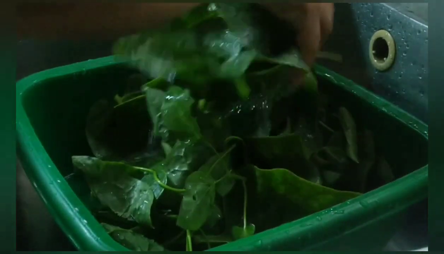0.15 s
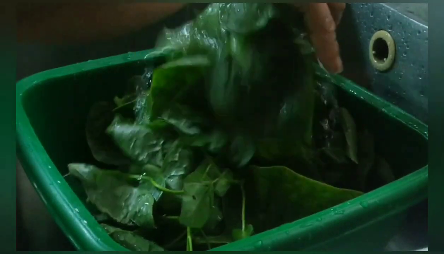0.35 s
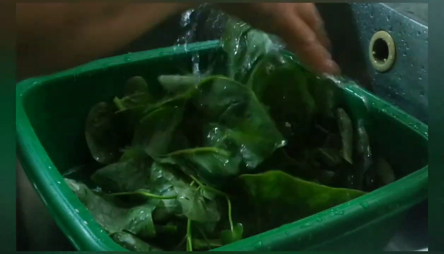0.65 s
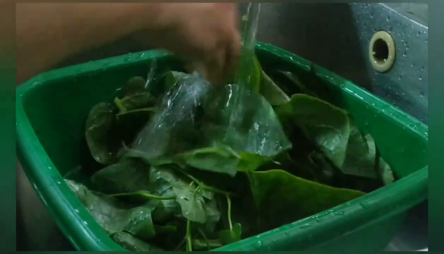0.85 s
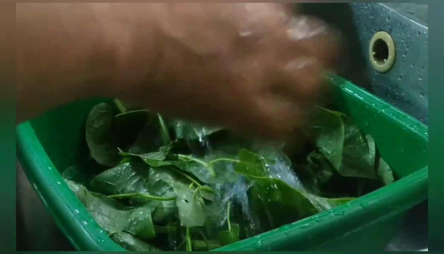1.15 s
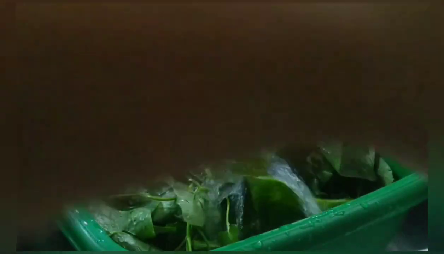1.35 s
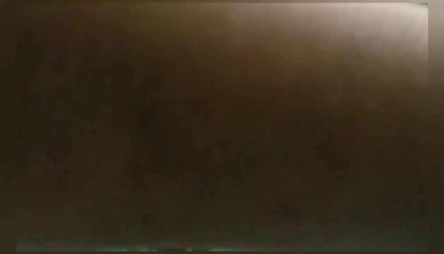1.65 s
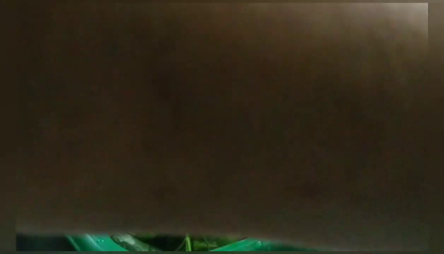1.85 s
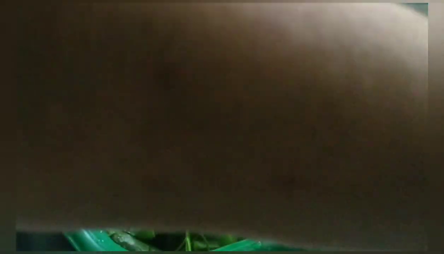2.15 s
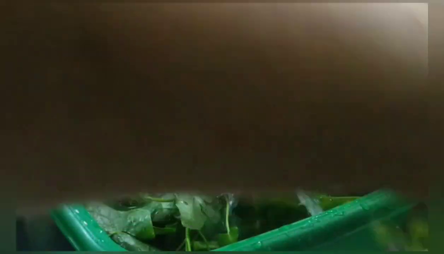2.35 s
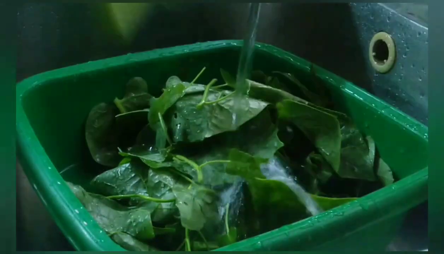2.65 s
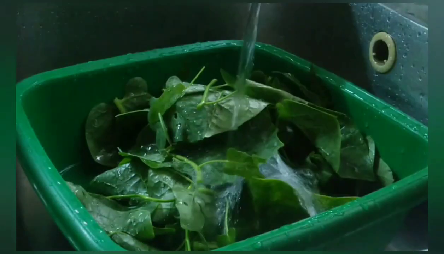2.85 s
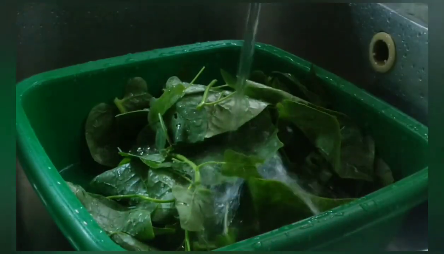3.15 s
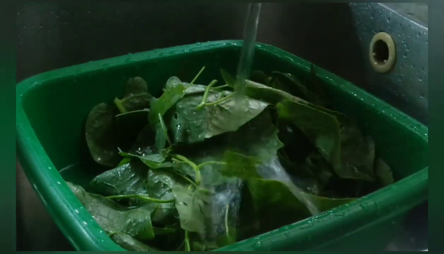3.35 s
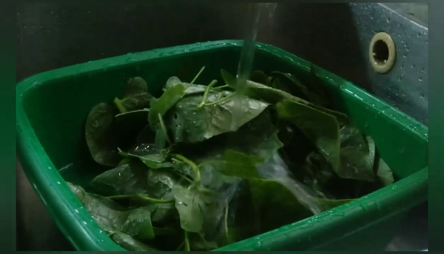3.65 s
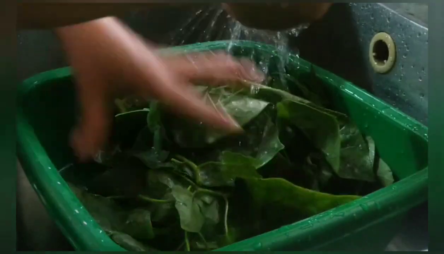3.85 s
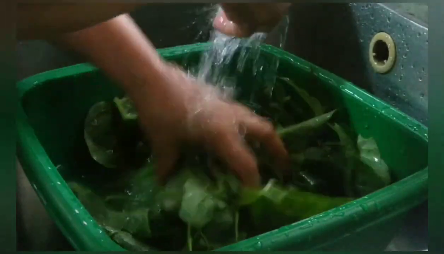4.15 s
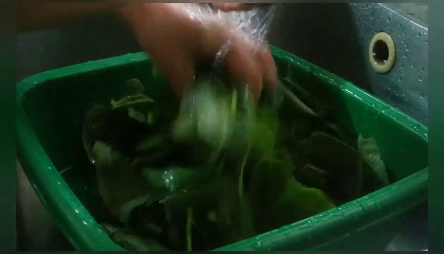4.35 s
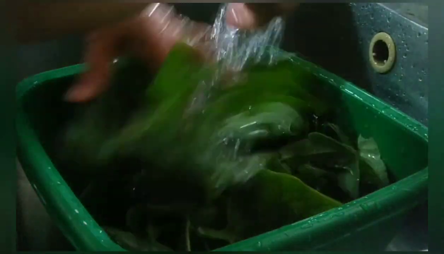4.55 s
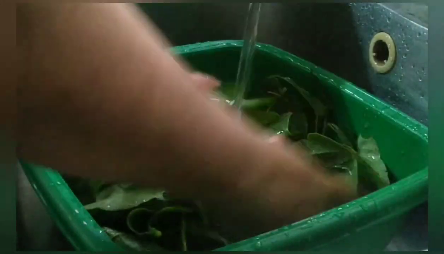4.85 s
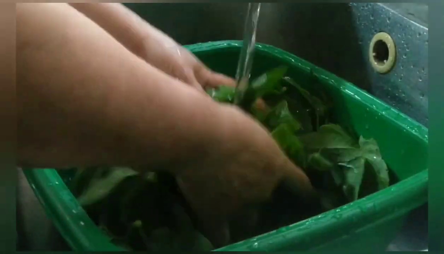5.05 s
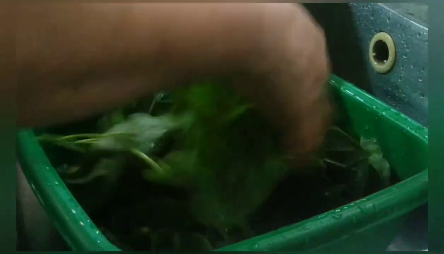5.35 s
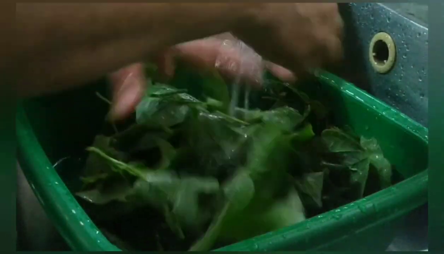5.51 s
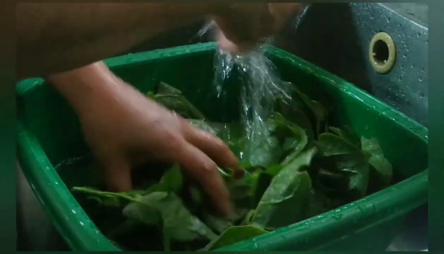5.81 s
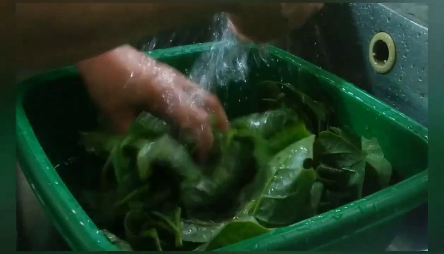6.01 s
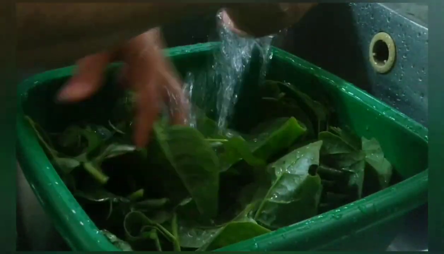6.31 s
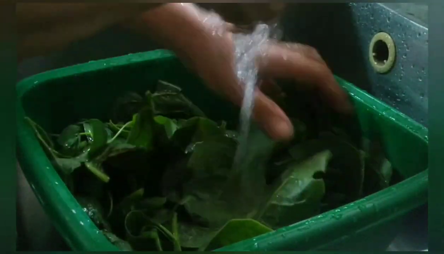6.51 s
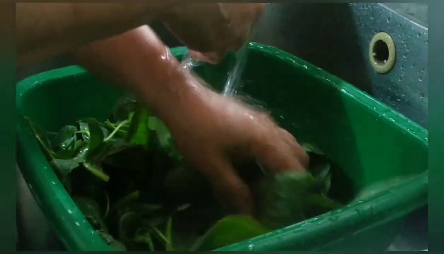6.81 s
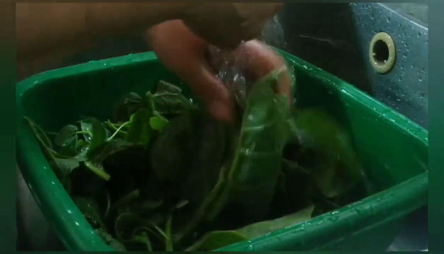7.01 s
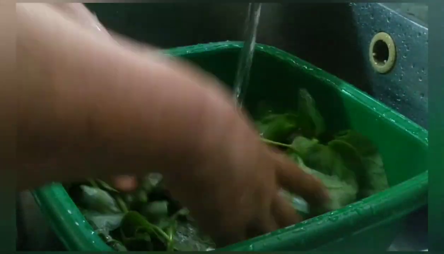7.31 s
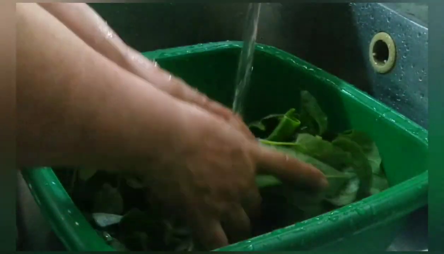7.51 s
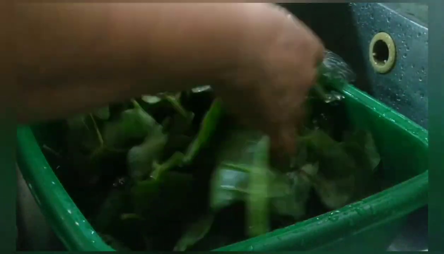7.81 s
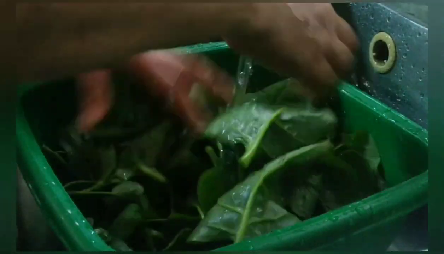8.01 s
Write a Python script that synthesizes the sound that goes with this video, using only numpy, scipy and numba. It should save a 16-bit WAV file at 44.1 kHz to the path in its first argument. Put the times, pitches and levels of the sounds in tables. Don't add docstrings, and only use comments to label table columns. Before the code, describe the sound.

A thin tap stream splashes on leafy greens in a plastic basin set in a steel sink. Hands lift and turn the leaves, making bursts of spray and gurgles. The water thins to a quiet patter, then the basin slips with a loud hollow clatter, and busier stirring follows with sharp knocks. Close stereo pickup in a small hard kitchen with faint hum.

```python
import sys
import numpy as np
from scipy import signal
from scipy.fft import rfft, irfft, next_fast_len
from scipy.io import wavfile
from scipy.ndimage import uniform_filter1d
from numba import njit

SR = 44100
rng = np.random.default_rng(int(sys.argv[2]) if len(sys.argv) > 2 else 0)


def materialize(psi):
    bounded = np.clip(np.atleast_2d(psi).T, -1, 1)
    quanta = np.round(bounded * 32767).astype(np.int16)
    wavfile.write(sys.argv[1], SR, quanta)


def makeup_ratio(level_db):
    decades = np.asarray(level_db, float) / 20
    return 10 ** decades


N = 360297
T = np.arange(N) / SR


def unit(x):
    return x / np.sqrt(np.mean(np.abs(x) ** 2))


def colour(x, points):
    size = next_fast_len(N)
    hz, db = np.transpose(points)
    f = np.log(np.arange(size // 2 + 1) * SR / size + 1)
    gain = makeup_ratio(np.interp(f, np.log(hz), db))
    return irfft(rfft(x, size) * gain, size)[..., :N]


def band(x, lo_hz, hi_hz):
    sos = signal.butter(3, [lo_hz, min(hi_hz, SR / 2.2)], "band", fs=SR, output="sos")
    return signal.sosfilt(sos, x)


def walk(rate):
    k = int(SR / rate)
    steps = np.repeat(rng.standard_normal(N // k + 1), k)[:N]
    return unit(uniform_filter1d(steps, k))


def every_sample(curve):
    return np.interp(T, T[::32], curve)


def peak(s, rise, fall):
    late = T[None, ::32] - np.array(s)[:, None]
    before = -late / np.array(rise)[:, None]
    after = late / np.array(fall)[:, None]
    return np.exp(-np.where(late > 0, after, before))


def gestures_db(table):
    s, db, rise, fall = np.transpose(table)
    return every_sample(db @ peak(s, rise, fall))


def swells(table, rest_db, column):
    s, rise, fall = np.transpose(table)[:3]
    power = makeup_ratio(rest_db) ** 2 + makeup_ratio(column) ** 2 @ peak(s, rise, fall) ** 2
    return every_sample(np.sqrt(power))


@njit
def grains(count, start, hz, cycles, size, lean, glide, rise):
    out = np.zeros((2, count))
    for k in range(len(start)):
        p = np.exp((2j * np.pi - 1 / cycles[k]) * hz[k] / SR)
        turn = np.exp(2j * np.pi * glide * (hz[k] / SR) ** 2 / cycles[k])
        opening = np.exp(-hz[k] / SR / (rise * cycles[k]))
        z, unopened = size[k] + 0j, 1.
        for i in range(start[k], min(count, start[k] + int(6 * cycles[k] * SR / hz[k]))):
            out[0, i] += (1 - unopened) * z.imag
            out[1, i] += (1 - unopened) * lean[k] * z.real
            z *= p
            p *= turn
            unopened *= opening
    return out


# (frequency [Hz], level [dB per Hz])
SPRAY_COLOUR = [(410, -35), (700, -7.5), (829, -2), (909, -1.5), (1310, -1), (1590, -9.5), (2450, -6),
                (3020, -8), (3620, -9), (5020, -10.5), (9140, -12.5), (11300, -19), (13300, -18),
                (15800, -22.5)]


def drops(lo_hz, hi_hz, count, cycles, burst_s, scatter_db, hiss, gush_db):
    u = np.repeat(rng.random((count, 3)), 3, axis=0).T
    v = rng.random((3 * count, 3)).T
    lean = 0.84 + 1.06 * np.repeat(rng.standard_normal(count), 3)
    hz = lo_hz * (hi_hz / lo_hz) ** u[1] * (.88 + 0.241 * v[0])
    hz = np.minimum(hz, SR / 2.4)
    size = makeup_ratio(scatter_db * np.minimum(-np.log(u[2] + 1e-9), 2.7)) * hz / hi_hz
    start = (u[0] * N + burst_s * SR * v[1]).astype(np.int64)
    fizz = grains(N, start, hz, cycles * (0.23 + 1.8 * v[2]), size, lean, 0.031, 0.1)
    mist = unit(fizz) + hiss * unit(band(rng.standard_normal((2, N)), lo_hz, hi_hz))
    return unit(band(colour(mist, SPRAY_COLOUR), lo_hz, hi_hz)) * makeup_ratio(gush_db * walk(22))


# (time [s], splash level [dB], fine spray relative to it [dB])
STREAM = [(0.0, -44, -5.5), (0.41, -39, -2), (0.975, -41.5, -0.5), (1.323, -49.5, 2.5), (2.042, -43.5, 1),
          (2.204, -52.5, 3.5), (2.559, -48, 4), (3.76, -44.5, 2), (3.998, -38, -3.5), (4.392, -37.5, -4),
          (4.7, -37.5, 0.5), (5.0, -33, -1.5), (5.359, -46.5, -1.5), (5.847, -37.5, -3), (6.5, -41, -1.2),
          (7.084, -41.0, -4), (7.377, -33.5, -2.5), (8.17, -36.5, 0.5)]
# (time [s], gain [dB], rise [s], fall [s])
THROWN_WATER = [(0.063, 7, 0.11, 0.016), (0.716, 4, 0.065, 0.019), (0.892, 9.5, 0.033, 0.055),
                (3.73, 1, 0.014, 0.026), (3.877, 5.5, 0.024, 0.011), (4.688, 1.5, 0.04, 0.085),
                (5.675, 4, 0.32, 0.015), (6.093, 10.5, 0.042, 0.034), (6.272, 3, 0.018, 0.2),
                (6.53, 9, 0.013, 0.03), (6.656, 8, 0.032, 0.013), (7.706, 6.5, 0.039, 0.14)]
# (time [s], loss [dB], rise [s], fall [s])
CAUGHT_STREAM = [(0.494, -14, 0.062, 0.18), (0.754, -12.0, 0.022, 0.05), (1.841, -8.5, 0.055, 0.047),
                 (2.509, -4, 0.019, 0.035), (3.275, -2.5, 0.03, 0.037), (3.803, -14, 0.034, 0.05),
                 (3.889, -9.4, 0.016, 0.032), (4.553, -21, 0.065, 0.035), (4.815, -13.5, 0.019, 0.033),
                 (4.897, -8, 0.018, 0.18), (5.998, -4.5, 0.11, 0.045), (6.206, -7.5, 0.14, 0.01),
                 (6.514, -4, 0.02, 0.012), (6.598, -8, 0.028, 0.02), (7.155, -12.5, 0.039, 0.016),
                 (7.251, -4.5, 0.024, 0.067), (7.884, -15, 0.11, 0.114)]
# (time [s], rise [s], fall [s], gurgle [dB], coarse drops relative to it [dB])
LEAF_STIRS = [(0.001, 0.05, 0.034, -39.5, -2.5), (0.969, 0.043, 0.048, -42, -1.5),
              (2.009, 0.076, 0.115, -59, 3), (2.441, 0.051, 0.285, -52, -7),
              (3.31, 0.0089, 0.059, -46.5, 15.5), (3.987, 0.048, 0.097, -42, 0),
              (4.116, 0.056, 0.092, -35.5, -2.0), (4.776, 0.003, 0.012, -39.5, 17.5),
              (4.893, 0.24, 0.097, -37, -1.5), (5.022, 0.07, 0.191, -36.5, 1.5),
              (5.745, 0.11, 0.18, -42, -11), (5.891, 0.15, 0.289, -48, 6),
              (6.236, 0.068, 0.12, -59.5, 12.5), (6.523, 0.003, 0.025, -55, 17),
              (6.712, 0.054, 0.33, -45, 2.5), (6.841, 0.13, 0.084, -41, -3), (7.266, 0.07, 0.039, -39, 0),
              (7.527, 0.12, 0.16, -36.5, -3), (7.726, 0.101, 0.12, -51.5, -2),
              (8.156, 0.24, 0.111, -45.5, 2)]
# (time [s], gain [dB], rise [s], fall [s])
LEAF_FOLDS = [(0.24, 7, 0.037, .05), (0.4, 7.5, .03, 0.034), (0.55, 11, 0.088, 0.085), (0.76, -5, .05, .05),
              (1.12, 7.5, .04, 0.049), (1.6, -7, 0.12, 0.22), (3.36, 3, .03, .04), (3.62, -4, .06, .1),
              (4.3, 7, .05, 0.059), (5.3, 2.5, 0.088, 0.054), (6.93, -14.5, 0.036, .025),
              (7.07, -7, 0.026, 0.035), (7.209, -8, .03, .03)]


def spray():
    s, splash_points, fine_points = np.transpose(STREAM)
    hands_db = gestures_db(THROWN_WATER) + gestures_db(CAUGHT_STREAM)
    splash_db = np.interp(T, s, splash_points) + hands_db
    fine_db = splash_db + np.interp(T, s, fine_points)
    gurgle_db, coarse_db = np.transpose(LEAF_STIRS)[3:]
    coarse_level = swells(LEAF_STIRS, -67.0, gurgle_db + coarse_db) + makeup_ratio(splash_db - 12.5)
    coarse_level = coarse_level * makeup_ratio(gestures_db(LEAF_FOLDS))

    coarse = coarse_level * drops(1278, 3307, count=2600, cycles=5.5, burst_s=.006,
                                  scatter_db=3.0, hiss=0.62, gush_db=0.0)
    splash = makeup_ratio(splash_db) * drops(3112, 8260, count=5000, cycles=6.7, burst_s=.003,
                                    scatter_db=3.0, hiss=0.66, gush_db=0.8)
    fine = makeup_ratio(fine_db) * drops(7780, 18100, count=5000, cycles=9.4, burst_s=.002,
                                scatter_db=6.0, hiss=0.8, gush_db=2.0)
    gurgle = drops(702, 1373, count=1100, cycles=4.1, burst_s=.012,
                   scatter_db=2.0, hiss=0.36, gush_db=1.0)
    gurgle = swells(LEAF_STIRS, -61.5, gurgle_db) * gurgle
    gurgle = gurgle + makeup_ratio(3.5) * band(gurgle, 770, 890)
    flutter = makeup_ratio(0.77 * walk(24) + 1.9 * walk(70) - 2.5)
    return flutter * (coarse + splash + fine) + gurgle


# (time [s], peak level [dB], pitch [Hz])
BIG_SPLATS = [(0.121, -28, 2300), (0.1506, -23, 5300), (0.182, -18, 5740), (2.748, -24, 7450),
              (0.8619, -19.5, 9270), (0.8734, -18, 4440), (1.0959, -23, 6340), (2.0438, -25.5, 3230),
              (3.045, -20, 8300), (3.3107, -21, 2330), (3.3149, -8, 1850), (3.7214, -22, 7740),
              (4.0238, -16.5, 4060), (4.0721, -21, 3670), (4.1774, -18.5, 7270), (4.3725, -22, 3370),
              (4.4453, -22.5, 2120), (4.6638, -15.5, 4800), (4.8633, -19, 3020), (5.665, -15.5, 8730),
              (6.0701, -19.5, 8300), (6.6029, -19.5, 8950), (6.661, -14.5, 2290), (6.972, -26, 2480),
              (7.117, -10.5, 3640), (7.1726, -24, 8500), (7.6765, -16, 7450), (7.7253, -17, 6320),
              (7.8665, -22.5, 2100), (7.9195, -26, 6670)]


def splats():
    length_s = .005
    s, db, hz = np.repeat(BIG_SPLATS, 8, axis=0).T
    u = rng.random((len(s), 3)).T
    start = ((s - .001 + length_s * 2.2 * u[0] ** 2.6) * SR).astype(np.int64)
    cycles = length_s * hz * 0.32 + 0.86
    return grains(N, start, hz * (0.832 + 0.341 * u[1]), cycles, makeup_ratio(db - 7), .2 + 1.0 * u[2], 0.034, 0.07)


def pops(table, count, spread, length_s, cycles, gain_db, fade_db):
    s, db, hz = np.repeat(table, count, axis=0).T
    u = rng.random((len(s), 3)).T
    start = ((s - .0004 + length_s * u[0] ** 2) * SR).astype(np.int64)
    hz = np.minimum(hz * np.exp(spread * (u[1] - .5)), SR / 2.6)
    size = makeup_ratio(db + gain_db - fade_db * u[0] ** 2)
    return grains(N, start, hz, cycles * (0.6 + 0.89 * u[0]), size, .2 + 1.3 * u[2], 0.04, .05)


# (time [s], peak level [dB], pitch [Hz])
DROPLET_TICKS = [(0.0198, -29, 5790), (0.0557, -29, 6450), (0.0766, -21, 7700), (0.3271, -23, 8400),
                 (0.3759, -22.5, 6260), (0.7296, -27, 6790), (0.79, -26.5, 8300), (0.8469, -31, 9030),
                 (0.9471, -28, 7200), (0.9731, -30, 9330), (0.9851, -20, 13000), (3.0259, -35, 9630),
                 (3.1247, -25, 13100), (3.5612, -29, 6850), (3.7353, -21.5, 6140), (3.9573, -22, 9750),
                 (4.0541, -36, 7980), (4.2162, -25, 9500), (4.6398, -27, 9300), (4.7176, -22, 9170),
                 (4.785, -23, 8040), (5.0653, -22, 5700), (5.201, -24, 8590), (5.5886, -21, 13240),
                 (6.0381, -24, 6360), (6.2431, -25, 7880), (6.3015, -21, 6980), (6.4616, -24, 7800),
                 (6.5499, -20.5, 9070), (6.6203, -25, 9000), (6.6527, -16.5, 5800), (6.8542, -22, 8400),
                 (6.8961, -27, 6910), (6.9126, -27.5, 7160), (6.9759, -25.5, 9000), (7.004, -20, 9200),
                 (7.3416, -26, 5620), (7.4713, -25, 8810), (7.4933, -26, 5700), (7.5851, -24, 5770)]
# (time [s], peak level [dB], pitch [Hz])
BUBBLE_BLIPS = [(0.0138, -26, 3410), (0.0816, -22, 4700), (0.1929, -30, 5140), (0.3151, -28, 5340),
                (0.363, -31, 5240), (0.7197, -27.5, 4200), (0.8519, -29, 4470), (1.5498, -36.5, 4010),
                (3.86, -30, 3570), (4.0047, -24, 4100), (4.1115, -28, 2460), (4.1758, -25, 3910),
                (4.2746, -26.5, 3600), (4.4681, -25, 5050), (4.6502, -31, 4760), (4.9543, -33, 2210),
                (5.0059, -29, 1610), (5.0688, -22, 2390), (5.201, -33, 2150), (5.692, -29.5, 3950),
                (5.7757, -25, 4640), (5.9564, -28, 2280), (6.2745, -25, 3760), (6.303, -29, 3660),
                (6.3715, -26, 5020), (6.3898, -25, 3360), (6.4437, -27.5, 3100), (6.6208, -26, 4930),
                (6.759, -29, 2360), (6.8747, -28, 4570), (7.006, -29, 2620), (7.0847, -31, 4450),
                (7.2029, -24, 4830), (7.2463, -27.5, 1620), (7.409, -24, 4770), (7.4399, -27, 4170),
                (7.5846, -20, 4030), (7.642, -28, 4400), (7.9901, -28.5, 1700), (8.1423, -26, 3970)]
# (time [s], peak level [dB])
FLAT_SMACKS = [(0.402, -21), (0.68, -26), (0.704, -31), (0.865, -28), (2.58, -31), (2.723, -32),
               (2.747, -21), (2.841, -25), (3.311, -21), (3.352, -17), (3.412, -20), (3.721, -22),
               (4.07, -24.5), (4.861, -21), (5.598, -33), (5.665, -18), (6.246, -23), (7.919, -23)]


def droplets():
    ticks = pops(DROPLET_TICKS, count=6, spread=0.247, length_s=.008, cycles=14.6, gain_db=-5.0, fade_db=3.5)
    blips = pops(BUBBLE_BLIPS, count=5, spread=.17, length_s=.009, cycles=12.2, gain_db=-5.5, fade_db=4.5)
    pitched = [(s, db, 5500.) for s, db in FLAT_SMACKS]
    smacks = pops(pitched, count=14, spread=1.85, length_s=0.0065, cycles=5.3, gain_db=-9.0, fade_db=11)
    return ticks + blips + smacks


def ring(push, modes, sustain, spread):
    out, power = 0, 0
    for (hz, db, t60), lean in zip(modes, rng.standard_normal(len(modes))):
        p = np.exp(2j * np.pi * hz / SR - np.log(1000) / (min(t60, .45) * sustain * SR))
        z = makeup_ratio(db) * signal.lfilter([1], [1, -p], push)
        out = out + np.array([z.imag, (1 + spread * lean) * z.real])
        power += makeup_ratio(db) ** 2 / (1 - abs(p) ** 2) / 2
    return out / np.sqrt(power)


def rattle(times, db, lengths, rise_s):
    env = np.zeros(N)
    for s, gain, length in zip(times, makeup_ratio(db), np.clip(lengths, .001, .2)):
        t = np.arange(int(8 * length * SR)) / SR
        i = int(s * SR)
        chatter = gain * np.minimum(t / rise_s, 1) * np.exp(-t / length)
        env[i:i + len(t)] += chatter[:N - i]
    return env


# (time [s], peak level [dB], boom relative [dB], crack relative [dB], struck panel [Hz])
FIRM_KNOCKS = [(0.02, -34.5, 4, 8, 494), (0.956, -22.5, -15, -8, 880), (1.976, -26, -11, -21, 527),
               (2.04, -27, -10, 4, 830), (4.772, -4.5, -20, -13, 620), (4.861, -17.5, -22, -7, 830),
               (5.433, -30, -14, -12, 425), (5.456, -25.5, -19, -6, 520), (5.477, -25, -13, -16, 530),
               (6.52, -10, -14, 0, 520), (7.307, -22, -14, -17, 620), (7.856, -19.5, -21, -19, 511),
               (7.954, -26, -25, -1, 444)]
# (time [s], peak level [dB], boom relative [dB], struck panel [Hz], rattle length [s])
BASIN_TUMBLE = [(3.277, -15.5, -13, 402, 0.04), (3.297, -14, -25, 815, 0.0081),
                (3.304, -1.5, -19, 409, 0.011), (3.317, -6, -27, 987, 0.0077),
                (3.328, -10, -25, 511, 0.0072), (3.354, -12, -20, 850, 0.0066),
                (3.335, -6, -20, 936, 0.017), (3.36, -12.5, -9, 476, 0.015), (3.375, -17, -13, 430, .005),
                (3.389, -22, -5, 425, .008), (3.41, -11, -5.5, 425, 0.0062), (3.432, -21, -10, 417, .008),
                (3.447, -26, -5, 511, 0.011), (3.487, -22, -10, 455, 0.014),
                (3.526, -23.5, -1.5, 422, 0.0091)]
# (time [s], peak level [dB], boom
# relative [dB], struck panel [Hz], rattle length [s])
MORE_KNOCKS = [(0.761, -34, -24, 516, 0.013), (0.813, -31.5, -33, 560, 0.0063), (0.909, -32.5, -20, 1410, .01),
               (0.926, -29.5, -4, 430, .012), (0.966, -21.5, -18, 425, 0.0061), (0.933, -35, -20, 805, 0.014),
               (0.981, -34, -4, 430, 0.0086), (1.214, -30.5, -27, 570, 0.011), (1.402, -33, -22, 442, 0.013),
               (1.482, -44, 12.5, 533, 0.014), (1.802, -39, 8, 339, 0.0055), (4.589, -31, -20, 560, .014),
               (1.915, -32.5, -12, 847, .012), (1.993, -26.5, -14, 365, 0.012),
               (2.434, -30, -11.5, 1250, 0.023), (5.465, -29, -17, 490, 0.0048),
               (6.533, -20, -10, 428, 0.0091), (7.882, -34, -16, 524, 0.012), (4.785, -16.5, -8, 400, .007),
               (5.829, -31, -30, 1000, 0.0033), (6.031, -31, -25, 826, .008), (7.277, -30, -30, 830, .02),
               (7.311, -22, -20, 556, 0.0045), (7.989, -27, -23, 810, 0.0042), (4.566, -21, -28, 783, 0.015),
               (4.625, -26.5, -24.5, 594, 0.012), (6.194, -22, -32, 720, 0.0074),
               (6.228, -23.5, -25.5, 830, 0.0068), (7.318, -24, -21, 500, 0.0049),
               (7.336, -21, -23, 544, 0.0059), (7.476, -31, -21, 900, .0095), (7.979, -23, -16.5, 605, 0.011)]


def blows():
    rows = [(s, db, low, crack, hz, 0.0059 + 0.0001 * (-9.0 - db)) for s, db, low, crack, hz in FIRM_KNOCKS]
    for table, crack_db in ((BASIN_TUMBLE, -21.5), (MORE_KNOCKS, -9.5)):
        rows += [(s, db, low, crack_db, hz, length) for s, db, low, hz, length in table]
    return np.transpose(rows)


# (frequency [Hz], level [dB], time to fade 60 dB [s])
BASIN_WALLS = [(357, -6, 1.8), (429, 0.5, 0.27), (466.4, -8, 0.57), (511, 0.5, 0.13), (606, -0.5, 0.17),
               (824, 0, 0.2), (909, -8, 0.083), (1048, -12, 0.12), (1250, -14.5, 0.3), (1290, -45, 2.5),
               (1610, -11, 0.059), (1620, -33, 0.24), (1377, -15, 0.11), (2240, -26, 0.27)]
# (frequency [Hz], level [dB], time to fade 60 dB [s])
STEEL_SINK = [(49.4, -10, 0.34), (71, 3, 0.22), (93, -7, 0.36), (122, -7.5, 0.38), (139.8, -6, 0.27),
              (160, 2.5, 0.16), (209.8, -0.5, 0.23), (250, -19, 0.055)]
# (time [s], rise [s], fall [s], wall drumming [dB], sink boom [dB])
BASIN_PUSHES = [(0.0, 0.11, 0.191, -59, -46.7), (0.443, 0.26, 0.15, -47, -42.5),
                (0.999, 0.081, 0.026, -42, -38), (1.086, 0.096, 0.27, -48, -58.6),
                (1.533, 0.042, 0.048, -43, -28.5), (1.843, 0.045, 0.153, -58, -27.5),
                (1.979, 0.23, 0.23, -39.5, -49.8), (2.504, 0.186, 0.216, -46.5, -57),
                (2.79, 0.07, 0.099, -44, -51), (3.109, 0.223, 0.26, -46.5, -48.8),
                (3.301, 0.012, 0.107, -38.7, -29.8), (3.447, 0.071, 0.081, -43, -17),
                (3.759, 0.2, 0.038, -39.5, -60), (4.204, 0.19, 0.053, -37, -36),
                (4.801, 0.041, 0.064, -50.0, -27), (4.941, 0.039, 0.15, -29, -28),
                (5.532, 0.17, 0.61, -47.5, -52), (6.593, 0.03, 0.077, -54, -32.4),
                (6.671, 0.057, 0.25, -40.5, -53.8), (6.997, 0.073, 0.031, -48.5, -44),
                (7.31, 0.02, 0.09, -39, -39), (7.344, 0.046, 0.031, -49.2, -28.5),
                (7.54, 0.036, 0.087, -35.5, -35.5), (8.105, 0.33, 0.112, -49, -47)]


def basin():
    drum_db, boom_db = np.transpose(BASIN_PUSHES)[3:]
    drum = swells(BASIN_PUSHES, -58.5, drum_db)
    load = swells(BASIN_PUSHES, -52.5, boom_db)
    s, db, low_db, crack_db, panel_hz, length = blows()
    noise = rng.standard_normal((5, N))

    patter = drum * makeup_ratio(3.3 * walk(45) - 5.5) + rattle(s, db - 7.5, length, 0.0019)
    walls = ring(patter * noise[0], BASIN_WALLS, sustain=0.35, spread=0.41)
    walls[0] += 0.59 * patter * unit(band(noise[3], 347, 1206))
    start, cycles = (s * SR).astype(np.int64), 0.67 * length * panel_hz
    panel = grains(N, start, panel_hz, cycles, makeup_ratio(db + 0.45), np.full(len(s), .8), -0.019, 0.21)

    shake = drum * makeup_ratio(-9.5) + rattle(s, db + low_db + 1.0, 1.57 * length, 0.0022)
    thud = ring(shake * noise[4], STEEL_SINK[3:], sustain=0.52, spread=0.2)
    boom = ring(load * makeup_ratio(-4.5) * noise[1], STEEL_SINK[:3], sustain=0.66, spread=.3)

    crack_db = db + crack_db - 6.0 + 0.32 * (db - 1.0)
    snap = unit(colour(noise[2], [(800, -29), (1800, -0.5), (5000, -2), (15000, -22.0)]))
    crack = rattle(s, crack_db, 0.75 * length, 0.00028) * snap
    return band(walls + panel, 369, 4000) + band(thud + boom, 27, 260) + crack * np.array([[1], [.6]])


# (time [s], peak level [dB], pitch [Hz])
SINK_SHOVES = [(0.022, -27, 133), (0.95, -28, 140), (1.491, -34, 85), (1.862, -36, 90), (2.11, -34.5, 101),
               (2.03, -34, 216), (2.452, -30.5, 201), (4.931, -22.5, 64.8), (5.5, -31, 201),
               (6.525, -25.5, 344), (7.31, -30, 160)]


def shoves():
    s, db, hz = np.transpose(SINK_SHOVES)
    start = (s * SR).astype(np.int64)
    return grains(N, start, hz, np.full(len(s), 4.5), makeup_ratio(db), np.zeros(len(s)), 0., 0.048)


# time [s], rise [s], fall [s]
FREE_JET = np.array([[1.3], [.3], [.2]])


def tap():
    noise = rng.standard_normal((2, 2, N))
    hiss = makeup_ratio(-60.0 + .8 * walk(30)) * unit(band(noise[0], 4200, 17000))
    free = every_sample(peak(*FREE_JET)[0])
    song = makeup_ratio(-65 + 7.4 * free + 1.1 * walk(14)) * unit(band(noise[1], 3440, 3630))
    return hiss + song


def kitchen(dry, t60, wet_db):
    t = np.arange(int(.5 * SR)) / SR
    tail = rng.standard_normal((2, len(t))) * np.exp(-np.log(1000) * t / t60) * (t > .003)
    tail /= np.sqrt(np.sum(tail[0] ** 2))
    return dry + makeup_ratio(wet_db) * signal.fftconvolve(dry[:1], tail, axes=1)[:, :N]


# (frequency [Hz], level [dB per Hz])
ROOM_COLOUR = [(12, -37), (20, 10), (80, 2.5), (264, -7.5), (561, 4.5), (680, -15.5), (824, -0.5),
               (1560, -65), (2000, -24), (2600, -43), (4400, -120)]


def room_tone():
    return makeup_ratio(-51.5) * unit(colour(rng.standard_normal((2, N)), ROOM_COLOUR))


# (frequency [Hz], level under their sum [dB])
OPENING_DIFFERENCE = [(60, -60), (110, -43), (200, -21.5), (380, -16.5), (700, -4.5), (1290, -3),
                      (2380, -4.5), (4400, 1.5), (8120, -11), (15000, -10.5)]


def scene():
    water = spray() + tap() + basin() + shoves()
    near = splats() + droplets()
    mid, side = kitchen(water + 0.44 * near, t60=0.37, wet_db=-8.5) + 0.23 * near + room_tone()
    side = colour(side, OPENING_DIFFERENCE)
    side = side + 0.048 * band(mid, 570, 5500)
    return np.array([mid + side, mid - side])


def low_pass(x):
    return signal.sosfilt(signal.butter(12, 16660, fs=SR, output="sos"), x)


def record(dry):
    cut = signal.sosfilt(signal.butter(4, 47, "high", fs=SR, output="sos"), dry)
    rounded = np.tanh(.8 * cut) / .8
    mix = signal.sosfilt(signal.ellip(12, .2, 80, 15800, fs=SR, output="sos"), rounded)
    return low_pass(mix)


dry = scene()
out = record(dry)
materialize(out)
```